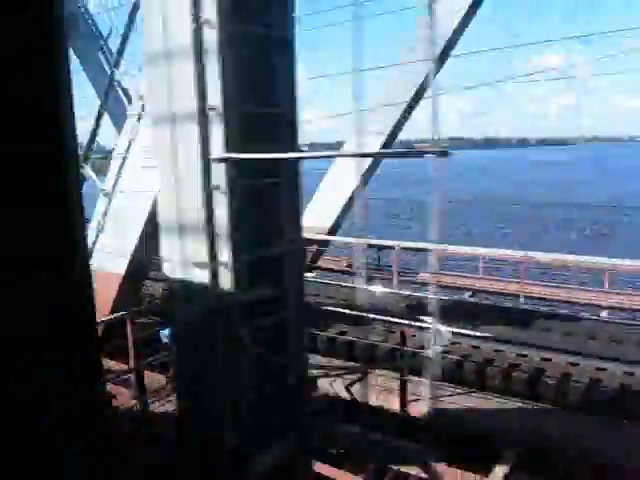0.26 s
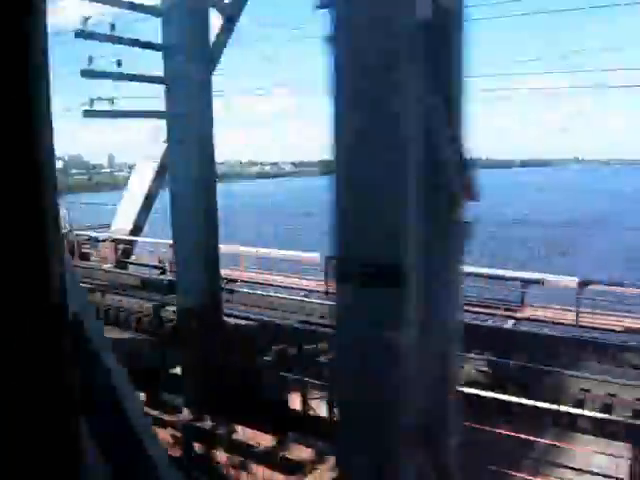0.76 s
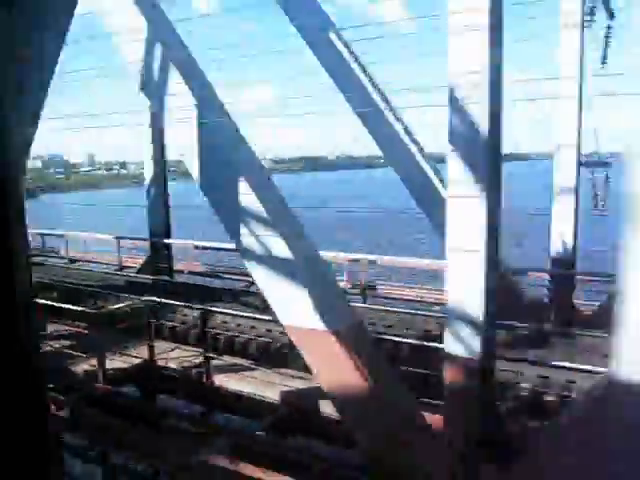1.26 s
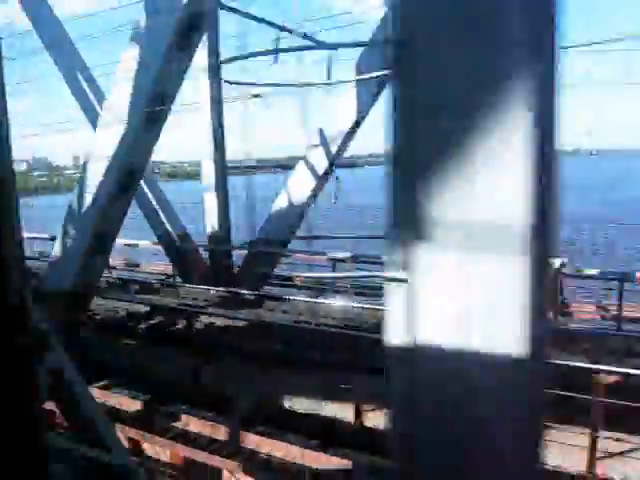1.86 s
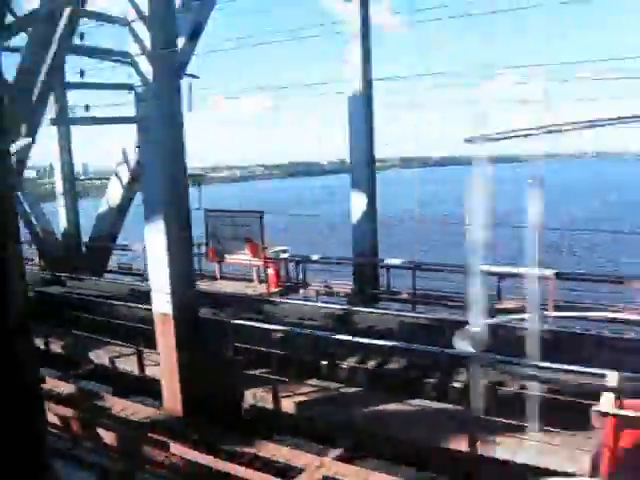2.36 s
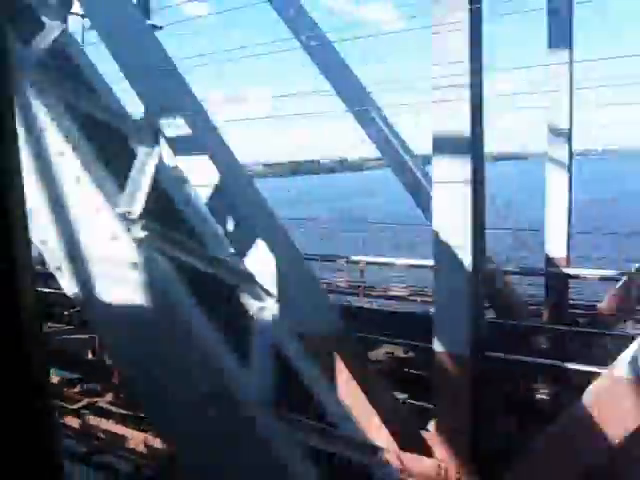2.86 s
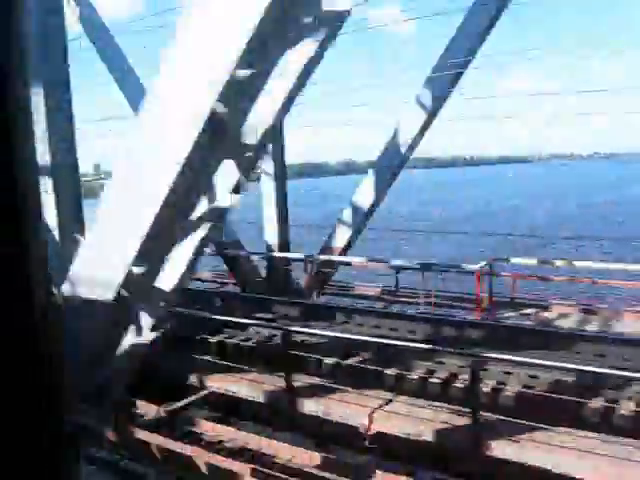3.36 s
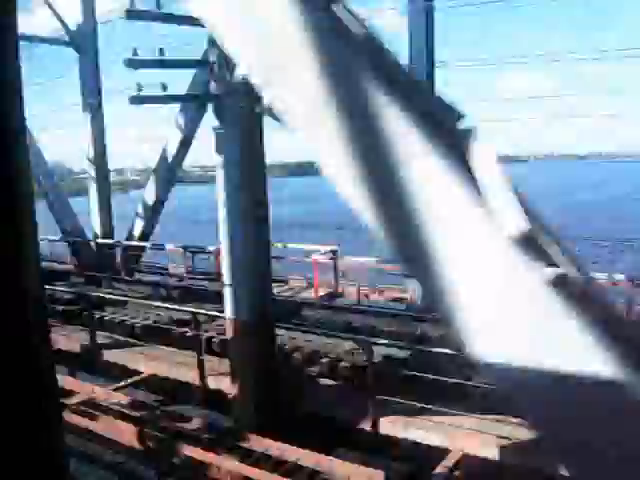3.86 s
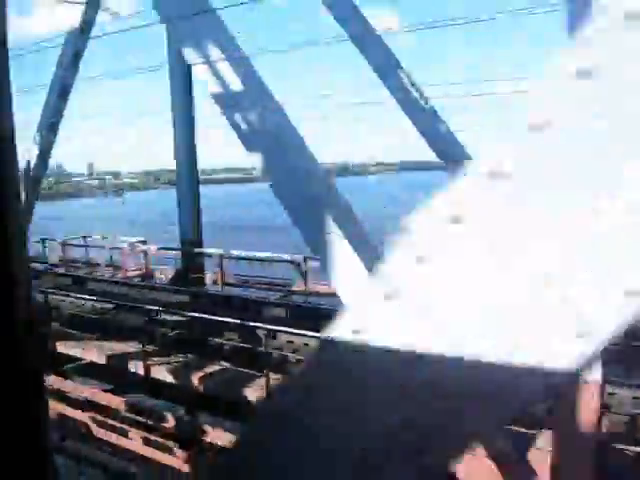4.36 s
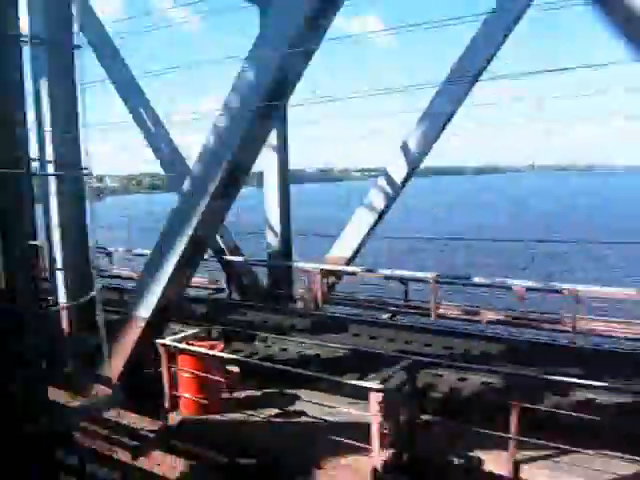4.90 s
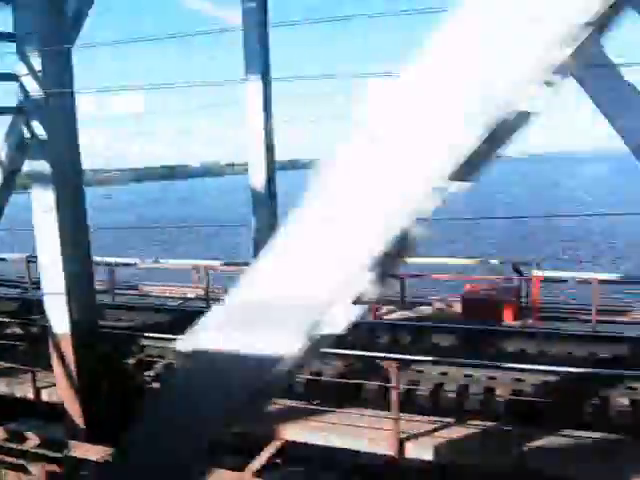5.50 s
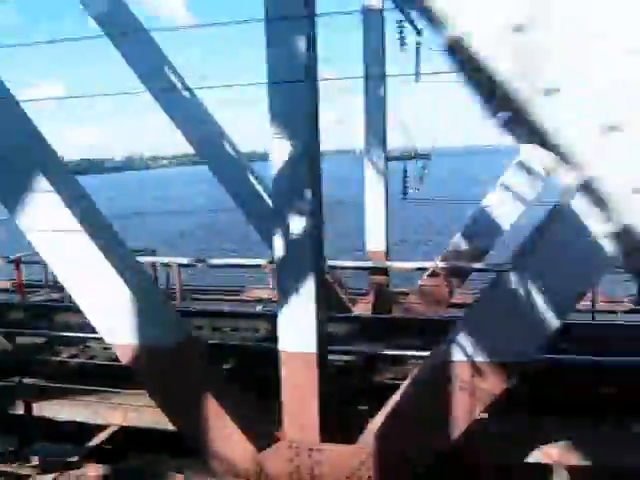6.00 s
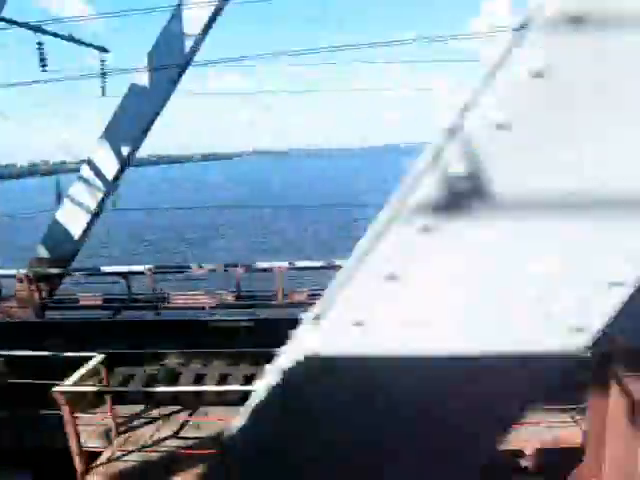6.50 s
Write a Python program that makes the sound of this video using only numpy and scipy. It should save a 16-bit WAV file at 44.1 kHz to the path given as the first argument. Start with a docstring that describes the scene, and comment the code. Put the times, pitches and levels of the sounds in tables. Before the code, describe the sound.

Inside a carriage crossing a steel truss bridge, wheels roar continuously under a thin rail hiss. Uneven clusters of hollow, boomy thumps come from rail joints, shaking the floor and swelling a low hum. Loose fittings buzz about twice a second and rasp in short bursts. Sharp dry snaps stand out near one second and before six, then a wheel sings faintly. Dull, mono, narrow-band microphone.

```python
"""Train on a steel bridge, inside a carriage

Wheel roar and rail hiss are filtered noise with a shared load flutter; a low hum swells with the shaking.
Blows at rail joints and dents excite body, running gear and floor; some set a single wall panel droning.
Loose fittings buzz rhythmically and rasp in bursts (filtered random impacts); close parts snap and tick.
Wheels ring faintly and one sings briefly near the end (wavering sines)."""
import sys
import numpy as np
from scipy import signal
from scipy.fft import rfft, irfft
from scipy.io import wavfile

SR = 44100
rng = np.random.default_rng(int(sys.argv[2]) if len(sys.argv) > 2 else 0)


def transcribe(u):
    """Save the signal u as a 16-bit wav file named by the first command-line argument.

    u: samples, shape (n,) or (channels, n), limited to [-1, 1]; the rate is SR.
    q: integer samples, one column per channel.
    """
    v = np.clip(np.atleast_2d(u).T, -1, 1)
    q = np.round(v * 32767).astype(np.int16)
    wavfile.write(sys.argv[1], SR, q)


N = 297234
TIME_S = np.arange(N) / SR

CUTOFF_HZ = 5300
CONTACT_S = 0.016  # pounding time of each blow
SHAKE_S = 0.024  # decay constant of the shaking
SWAY_FIRST_S, SWAY_PERIOD_S, SWAY_WIDTH_S = 0.27, 0.456, 0.028  # width: standard deviation of a buzz

# Wheels on rails, levels before trim: (time [s], wheel roar [dB], rail hiss [dB])
ROLLING_LEVELS = [(0, -28.5, -46.5), (0.2, -28.5, -50), (0.4, -27.5, -47), (0.8, -28, -47.5),
                  (1.15, -27.0, -46), (1.45, -27.5, -47), (1.75, -28, -46.5), (2.15, -28, -48.5),
                  (2.65, -27.5, -46.5), (2.78, -26.5, -44), (2.87, -28.5, -48), (2.99, -28.5, -40),
                  (3.2, -27.5, -47), (3.55, -28.5, -46.5), (3.75, -28.5, -49.5), (4.15, -26.5, -44.5),
                  (4.38, -28, -46.5), (4.5, -28, -54.5), (4.68, -29.5, -46.5), (4.9, -28, -49.5),
                  (5.2, -26.5, -44), (5.4, -29.5, -47.5), (5.68, -28.5, -48), (5.9, -29, -48),
                  (6.15, -25, -45), (6.32, -30, -53), (6.6, -24, -46.5), (6.74, -30.5, -48)]
# Wheels on joints and dents: (time [s], panel thump [dB], body boom [dB], gear clank [dB], floor shudder [dB])
JOINT_BLOWS = [(0.052, -43, -22, -41.5, -30), (0.086, -29.5, -25.5, -45, -41),
               (0.108, -33.5, -36, -43.5, -35.5), (0.138, -31.5, -23.5, -47, -36),
               (0.222, -33.5, -37, -46.5, -37), (0.249, -27, -21.5, -45, -36), (0.271, -40, -21, -50, -40),
               (0.306, -29.5, -23.5, -45, -37), (0.352, -31.5, -27, -49, -33.5),
               (0.385, -28, -34, -53, -39), (0.462, -30.5, -26, -49, -40), (0.52, -30, -23, -58, -47),
               (0.612, -32, -30, -55, -43.5), (0.69, -35, -54, -58, -45),
               (0.946, -30.5, -20.5, -43.5, -40.5), (0.998, -28.5, -20, -43.5, -45.5),
               (1.074, -30, -29, -46.5, -38), (1.108, -30.5, -22, -51, -39),
               (1.132, -28.5, -22.5, -45, -47), (1.247, -41, -33, -58, -51),
               (1.291, -37.5, -36, -54.5, -43.5), (1.392, -40, -38, -58, -46), (1.436, -44, -33, -60, -43),
               (1.648, -30.5, -22, -48, -41), (1.733, -47.5, -31, -55, -46), (1.855, -46, -31.5, -55, -51),
               (1.93, -39, -27.5, -53, -49), (2.087, -38, -25.5, -53, -46.5),
               (2.262, -29.5, -22.5, -46, -38.5), (2.42, -41.5, -31, -45.5, -41.5),
               (2.684, -35.5, -22, -50.5, -43.5), (2.723, -27.5, -23, -44, -37),
               (2.767, -33.5, -18.5, -39.5, -31.5), (2.788, -35, -18.5, -41.5, -31.5),
               (2.882, -28.5, -21.5, -60.5, -35), (2.914, -32, -22.5, -52.5, -38.5),
               (2.942, -30.5, -35, -38.5, -27), (2.963, -27.5, -26, -41, -50),
               (3.012, -27, -20.5, -45, -33.5), (3.06, -29.5, -22.5, -49, -38),
               (3.146, -37.5, -26.5, -52, -37), (3.31, -35, -27, -53, -49.5), (3.368, -31, -25.5, -52, -50),
               (3.525, -42, -52, -44.5, -49.5), (3.897, -30, -29, -44, -52),
               (3.978, -28.5, -21, -52.5, -50), (4.064, -41, -29.5, -49, -53),
               (4.138, -34, -23, -50, -50.5), (4.169, -27.5, -21.5, -55, -50),
               (4.224, -30.5, -19, -45, -45), (4.315, -28.5, -23, -47.5, -49.5),
               (4.35, -27.5, -24.5, -53, -46), (4.4, -29.5, -20, -48.5, -40), (4.512, -36, -26.5, -54, -46),
               (4.538, -29, -30, -57, -44), (4.572, -27, -36, -40.5, -34.5), (4.625, -32.5, -37, -43, -43),
               (4.711, -35, -33, -53, -50), (4.742, -32.5, -32, -43.5, -46),
               (4.772, -29, -24, -45.5, -41.5), (4.947, -36, -28, -56.0, -50),
               (5.043, -46, -29, -54.5, -48), (5.103, -34, -31.5, -47.5, -54.5),
               (5.192, -30, -20, -45.5, -35.5), (5.321, -33, -25.5, -47, -44),
               (5.371, -41, -29, -59.5, -48), (5.411, -36.5, -33, -60, -48), (5.466, -47, -40, -48.5, -54),
               (5.49, -33, -27, -56, -50), (5.555, -30.5, -30.5, -44, -38), (5.728, -34, -31, -55.5, -48),
               (6.007, -37.5, -21, -46, -41), (6.04, -30.5, -41.5, -49.5, -42.5),
               (6.11, -34.5, -39, -52.5, -38.5), (6.14, -39, -31, -47.5, -45.5),
               (6.202, -27.5, -19, -46.5, -38), (6.376, -26, -39, -43.5, -31.5),
               (6.405, -31.5, -35, -44.5, -33), (6.475, -29.5, -25, -47.5, -37),
               (6.538, -30, -19.5, -37.5, -29.5), (6.575, -38, -33, -53, -43), (6.62, -46, -21, -50, -31)]
# Panels caught by a blow: (time [s], pounding time [s], pitch [Hz], level [dB])
PANEL_DRONES = [(3.9, 0.069, 711, -38.5), (4.32, 0.065, 452, -31), (4.54, 0.025, 595, -32),
                (4.575, 0.06, 558.5, -32), (5.315, 0.023, 460, -31.5), (6.018, 0.049, 196.6, -27.5),
                (6.04, 0.028, 428, -28.5), (6.11, 0.052, 418.4, -26.5), (6.2, 0.015, 455, -24.5),
                (6.385, 0.046, 401.6, -28.5), (6.39, 0.037, 203, -28.5), (6.535, 0.019, 600, -28)]
# Close snaps and ticks: (time [s], peak level [dB], reference pitch [Hz])
SNAP_EVENTS = [(0.9028, -30, 3700), (1.0364, -29, 3300), (1.0418, -17, 3500), (1.0426, -24.5, 4370),
               (1.049, -33, 3900), (1.0544, -24, 4020), (1.0557, -22, 4000), (1.71, -35, 3700),
               (4.352, -35, 3700), (4.367, -33, 3900), (4.784, -42, 3700), (5.133, -30, 3500),
               (5.524, -32, 3400), (5.557, -34, 3650), (5.5653, -36, 3620), (5.575, -35, 3600),
               (5.7305, -32, 3480), (5.7356, -31, 3200), (5.74, -26, 3680), (5.7425, -23, 4110),
               (5.745, -21, 3640), (5.7487, -31, 3900), (5.9426, -34, 3600)]
# Bursts of a loose fitting: (time [s], length [s], level before resonance [dB])
RASP_BURSTS = [(0.33, 0.05, -54.5), (2.543, 0.14, -64), (3.528, 0.046, -60), (4.117, 0.072, -55),
               (4.348, 0.06, -53), (4.577, 0.04, -53), (4.62, 0.11, -61), (5.122, 0.047, -53),
               (5.277, .03, -57), (5.546, .035, -48.5), (6.16, 0.095, -54), (6.63, 0.05, -52)]
# Single wheel modes: (time [s], length [s], mean pitch [Hz], level before waver [dB])
WHEEL_RINGS = [(0, 6.2, 1564, -64), (1.044, 3.1, 3086, -66.5), (5.0, 1.6, 3310, -67),
               (5.099, 0.15, 2575, -52.5), (4.553, 1.7, 4580, -81.5), (5.703, 1.04, 2007, -57.5),
               (6.173, 0.23, 3740, -69.5), (6.168, 0.36, 4350, -75.5), (6.53, .12, 2010, -47.5)]
# Singing wheel, before waver: (time [s], level [dB], pitch [Hz])
SQUEAL_CURVE = [(6.0, -83, 2105), (6.16, -54, 2128), (6.195, -60, 2116), (6.215, -43.5, 2111),
                (6.28, -49, 2119), (6.41, -48.5, 2115), (6.45, -58, 2130), (6.48, -54, 2137),
                (6.58, -53, 2112), (6.74, -59, 2105)]

# Carriage body spectrum: (frequency [Hz], relative level [dB])
BODY_SPECTRUM = [(20, -33.5), (56, -6), (96, -4.5), (165, -6), (225, -1.5), (380, -0.5), (475, 5),
                 (535, -2), (620, 0.5), (675, -1.5), (880, -2.5), (1000, -7), (1230, -19), (1800, -24.5),
                 (3000, -60), (6000, -81)]
# Rail hiss spectrum: (frequency [Hz], relative level [dB])
STEEL_SPECTRUM = [(300, -35), (1250, -7), (1560, -1), (1900, -2.5), (2400, -3), (2900, -8), (3500, -19),
                  (4400, -33.5), (5500, -24.5)]
# Running gear spectrum: (frequency [Hz], relative level [dB])
CLANK_SPECTRUM = [(300, -31), (1250, -2.5), (1600, -1), (2000, -1), (2600, -2), (3000, -12.5),
                  (3600, -16.5), (4400, -27.5), (5500, -31)]
# Floor spectrum: (frequency [Hz], relative level [dB])
FLOOR_SPECTRUM = [(20, -33.5), (46, -10.5), (92, -1), (160, -4), (230, 1.5), (400, -31.5), (2000, -89.5)]
# Loose fittings spectrum: (frequency [Hz], relative level [dB])
FITTING_SPECTRUM = [(1000, -29.5), (2600, -7), (3200, -6.5), (3650, -7.5), (4020, -11.5), (4400, -12),
                    (4900, -28), (5300, -21), (5900, -46)]
# Snapping part spectrum: (frequency [Hz], relative level [dB])
SNAP_SPECTRUM = [(400, -22.5), (1400, 1.5), (2500, -3), (3450, -2), (4200, -1.5), (4950, -13), (5600, -22)]

# Carriage body resonances: (frequency [Hz], width [Hz], level over spectrum [dB])
BODY_RESONANCES = [(293.3, 13.2, 15), (345.5, 22, 6.5), (227, 13, -3.5), (420.7, 33, -2.5),
                   (559.7, 26, 4.5), (709, 26, 0.5), (886, 36, -4)]
# Wheel and running gear resonances: (frequency [Hz], width [Hz], level over spectrum [dB])
STEEL_RESONANCES = [(1597, 48, -2), (2080, 24, -3.5), (2290, 140, 1.5), (2420, 40, -1), (2540, 21, -2.5),
                    (2930, 20, 0.5)]
# Loose fittings resonances: (frequency [Hz], width [Hz], level over spectrum [dB])
FITTING_RESONANCES = [(2540, 33, 5), (3110, 77, 7.5), (3230, 23, 8), (3370, 20, 7.5), (3520, 46, 6),
                      (3680, 22, 8), (3800, 20, 9.5), (4130, 24, 8), (4390, 28, 5.5), (4500, 33, 5.5),
                      (4635, 26, 8.5), (4640, 44, 5.5)]
# Rasping fitting resonances: (frequency [Hz], width [Hz], level over spectrum [dB])
RASP_RESONANCES = [(3230, 50, 10), (3550, 45, 13), (3710, 50, 12.5), (4300, 50, 12.5), (4460, 45, 12.5),
                   (4750, 50, 12)]
# Snapping part resonances: (ratio to reference pitch [1], width [Hz], level over spectrum [dB])
SNAP_RESONANCES = [(0.96, 300, 12.5), (0.71, 300, 12), (0.4, 280, 10)]


def gain_of(db):
    """Decibels to amplitude."""
    return 10 ** (np.asarray(db) / 20)


def evened(x):
    """Scales to rms 1."""
    return x / np.sqrt(np.mean(x ** 2) + 1e-20)


def follow(rows, axis):
    """One table column interpolated at every sample."""
    columns = np.transpose(rows)
    return np.interp(TIME_S, columns[0], columns[axis])


def add(mix, start_s, sound):
    """Mixes a sound in, cut off at the end of the mix."""
    part = mix[round(start_s * SR):][:len(sound)]
    part += sound[:len(part)]


def wander(cutoff_hz):
    """Low-passed noise of rms 1."""
    f_hz = np.fft.rfftfreq(N, 1 / SR)
    spectrum = rfft(rng.standard_normal(N)) / (1 + (f_hz / cutoff_hz) ** 4)
    return evened(irfft(spectrum, N))


def fading(t_s, t60_s):
    """Exponential decay by 60 dB in t60_s, starting when t_s passes 0."""
    return np.exp(-np.log(1000) * np.maximum(t_s, 0) / t60_s)


def response(spectrum, modes=(), size=16384):
    """Minimum-phase impulse response of energy 1: broad spectrum plus the power of its resonances."""
    f_hz = abs(np.fft.fftfreq(size, 1 / SR))
    points_hz, points_db = np.transpose(spectrum)
    gain = gain_of(np.interp(np.log(f_hz + 1), np.log(points_hz), points_db))
    power = 1
    for hz, width_hz, over_db in modes:
        power = power + gain_of(over_db) ** 2 / (1 + (2 * (f_hz - hz) / width_hz) ** 2)
    log_gain = np.log(gain * np.sqrt(power))
    minimum_phase = np.exp(signal.hilbert(log_gain).conj())
    ring = np.fft.ifft(minimum_phase).real[:size // 2]
    return ring / np.linalg.norm(ring)


def through(force, ring):
    """Force convolved with a structure's impulse response."""
    return signal.fftconvolve(force, ring)[:len(force)]


def grains(per_s, spread_db):
    """Random tiny impacts of uneven size and either sign, rms 1."""
    size = gain_of(spread_db * np.minimum(rng.exponential(1, N), 4))
    sign = rng.choice([-1, 1], N)
    struck = rng.random(N) < per_s / SR
    return evened(size * sign * struck)


def tone(level, hz, drift_hz, drift_rate_hz, waver_db):
    """Sine wavering in pitch and level; drift_hz and waver_db are rms."""
    turns = np.cumsum(hz + drift_hz * wander(drift_rate_hz)) / SR
    waver = gain_of(waver_db * wander(drift_rate_hz))
    return np.sqrt(2) * np.sin(2 * np.pi * turns) * level * waver


def blow(ring, rise, t60_s, kick):
    """Kick plus swelling, dying contact judder through a structure; rms 1 over the first 40 ms."""
    t_s = np.arange(SR // 3) / SR
    swell = 1 - np.exp(-t_s / (rise * CONTACT_S))
    judder = rng.standard_normal(len(t_s)) * swell * fading(t_s - CONTACT_S, t60_s)
    force = judder / np.linalg.norm(judder)
    force[0] += kick
    sound = through(force, ring)
    return sound / np.sqrt(np.mean(sound[:SR // 25] ** 2))


def boom(length_s, hz=288, spread=0.03, rise=0.73, t60_s=0.098):
    """One panel mode swells during the pounding, then rings out; rms 1 at its height."""
    t_s = np.arange(SR // 3) / SR
    swell = (1 - np.exp(-t_s / (rise * length_s))) * fading(t_s - length_s, t60_s)
    pitch_hz = hz * (1 + spread * rng.standard_normal())  # slightly different patch of panel each time
    wave = np.sin(2 * np.pi * (pitch_hz * t_s + rng.random()))
    return np.sqrt(2) * swell / swell.max() * wave


def shaking(axis):
    """Carriage shaking: each blow adds energy from one of its columns, which soon dies away."""
    power, t_s = np.zeros(N), np.arange(SR) / SR
    settle = (1 - np.exp(-t_s / CONTACT_S)) * np.exp(-t_s / SHAKE_S)
    for row in JOINT_BLOWS:
        add(power, row[0], (gain_of(row[axis]) * settle) ** 2)
    return np.sqrt(power)


def hum(shake, steady_db=-52.5, shaken_db=-6.0):
    """Low carriage hum that swells with the shaking."""
    level = np.hypot(gain_of(steady_db), gain_of(shaken_db) * shake)
    return tone(level, hz=37.5, drift_hz=2.9, drift_rate_hz=2.8, waver_db=1.5)


def rolling(roar_trim_db=-1.46, hiss_trim_db=-2.0, flutter_db=1.2, grit_db=0.4):
    """Rough wheels on rough rails: fluttering contact load moves roar and hiss together."""
    load_db = flutter_db * wander(3.6)
    roar = through(rng.standard_normal(N), response(BODY_SPECTRUM, BODY_RESONANCES))
    roar_db = follow(ROLLING_LEVELS, axis=1) + roar_trim_db + load_db
    hiss = through(grains(per_s=4000, spread_db=0), response(STEEL_SPECTRUM, STEEL_RESONANCES))
    hiss_db = follow(ROLLING_LEVELS, axis=2) + hiss_trim_db + load_db + grit_db * wander(70)
    return roar * gain_of(roar_db) + hiss * gain_of(hiss_db)


def ringing(drift_hz=9, waver_db=1.5):
    """Rubbing on the rail keeps single wheel modes sounding for a while."""
    out, unrest = np.zeros(N), wander(25.1)
    for start_s, length_s, hz, db in WHEEL_RINGS:
        rub = np.roll(unrest, rng.integers(N))[:round(length_s * SR)]
        turns = np.cumsum(hz + drift_hz * rub[::-1]) / SR  # reversed, so pitch and level differ
        line = np.sqrt(2) * np.sin(2 * np.pi * turns) * gain_of(db + waver_db * rub)
        add(out, start_s, line * signal.windows.tukey(len(rub), 0.5))
    return out


def squeal():
    """Singing wheel: one wavering sine along a pitch and level curve."""
    level, hz = gain_of(follow(SQUEAL_CURVE, axis=1)), follow(SQUEAL_CURVE, axis=2)
    return tone(level, hz, drift_hz=9.5, drift_rate_hz=50, waver_db=2.0)


def chatter(shake, steady_db=-62.0, buzz_db=-58.5, shaken_db=-29.0, bounce_db=1.0):
    """Loose window and wall fittings tick faintly, and buzz at each sway and after blows."""
    phase = ((TIME_S - SWAY_FIRST_S) / SWAY_PERIOD_S + 0.5) % 1
    offset_s = (phase - 0.5) * SWAY_PERIOD_S  # from the nearest sway
    buzz = gain_of(buzz_db) * np.exp(-0.5 * (offset_s / SWAY_WIDTH_S) ** 2)
    level = gain_of(steady_db) + np.hypot(buzz, gain_of(shaken_db) * shake)
    ticks = evened(grains(per_s=3000, spread_db=5.0) * gain_of(bounce_db * wander(90)))
    return level * through(ticks, response(FITTING_SPECTRUM, FITTING_RESONANCES))


def rasps():
    """One small metal fitting rattles in bursts and rings at its own thin pitches."""
    level = np.zeros(N)
    for start_s, length_s, db in RASP_BURSTS:
        add(level, start_s, gain_of(db) * signal.windows.tukey(round(length_s * SR), 0.6))
    impacts = level * grains(per_s=1500, spread_db=4.0)
    return through(impacts, response(FITTING_SPECTRUM, RASP_RESONANCES))


def panels():
    """Some blows catch a single wall panel, which drones briefly at its own pitch."""
    out = np.zeros(N)
    for start_s, length_s, hz, db in PANEL_DRONES:
        add(out, start_s, gain_of(db) * boom(length_s, hz, spread=0.008, rise=0.71, t60_s=0.11))
    return out


def snaps(scrape=0.06, t60_s=0.012):
    """Dry, close snaps: an impulse and a tiny scrape excite three brief resonances."""
    out, t_s = np.zeros(N), np.arange(SR // 40) / SR
    for start_s, peak_db, hz in SNAP_EVENTS:
        force = scrape * rng.standard_normal(len(t_s)) * fading(t_s, t60_s)
        force[0] = 2
        modes = [(ratio * hz, width_hz, over_db) for ratio, width_hz, over_db in SNAP_RESONANCES]
        sound = through(force, response(SNAP_SPECTRUM, modes, size=2048))
        add(out, start_s, gain_of(peak_db) * sound / abs(sound).max())
    return out


def joints():
    """Wheels hitting joints and dents ring body panels, main body mode, running gear and floor."""
    body = response(BODY_SPECTRUM, BODY_RESONANCES[1:])  # boom() supplies the main mode
    gear = response(CLANK_SPECTRUM, STEEL_RESONANCES)
    floor = response(FLOOR_SPECTRUM)
    out = np.zeros(N)
    for start_s, thump_db, boom_db, clank_db, shudder_db in JOINT_BLOWS:
        add(out, start_s, gain_of(thump_db) * blow(body, rise=0.12, t60_s=0.19, kick=0.064))
        add(out, start_s, gain_of(boom_db) * boom(CONTACT_S))
        add(out, start_s, gain_of(clank_db) * blow(gear, rise=0.14, t60_s=0.29, kick=0.05))
        add(out, start_s, gain_of(shudder_db) * blow(floor, rise=0.36, t60_s=0.25, kick=0.067))
    return out


def scene():
    """Sum of all sources, one channel."""
    wheels = squeal() + rolling() + joints() + ringing()
    carriage = panels() + rasps() + chatter(shaking(axis=1)) + hum(shaking(axis=4))
    return (wheels + carriage + snaps())[None]


def record(dry):
    """Narrow-band microphone: linear-phase low-pass."""
    lowpass = signal.firwin(301, CUTOFF_HZ, window=("kaiser", 8), fs=SR)
    return signal.oaconvolve(dry, lowpass[None], "same")


dry = scene()
out = record(dry)
transcribe(out)
```